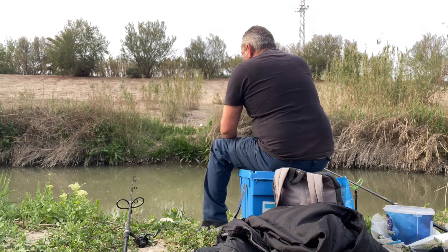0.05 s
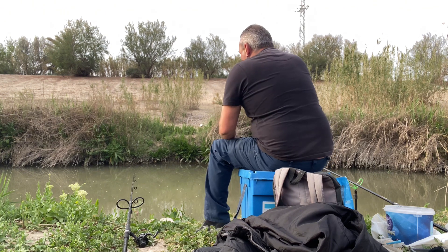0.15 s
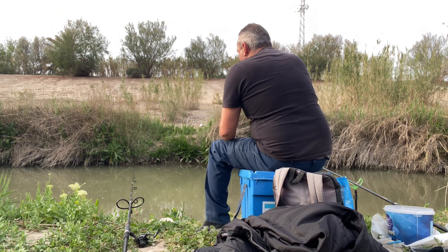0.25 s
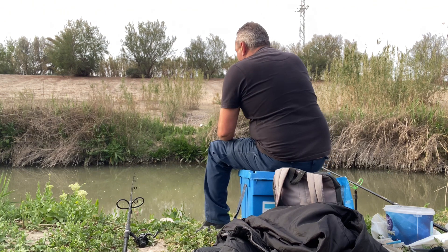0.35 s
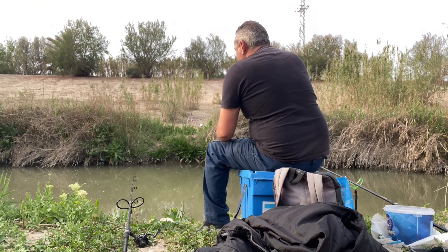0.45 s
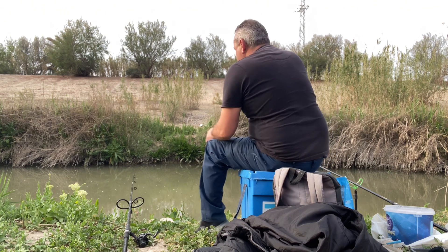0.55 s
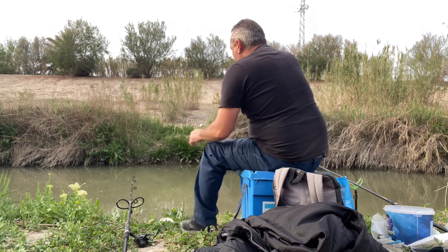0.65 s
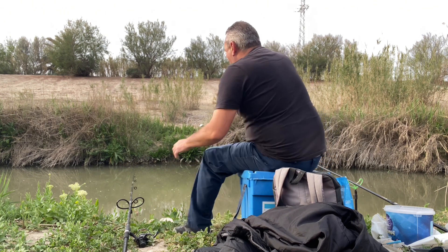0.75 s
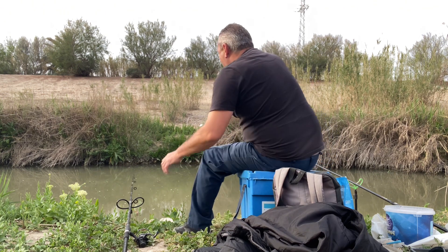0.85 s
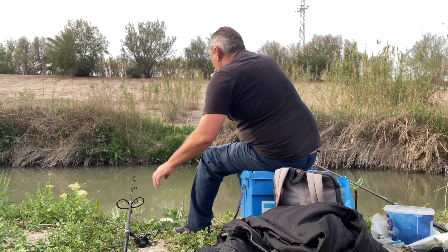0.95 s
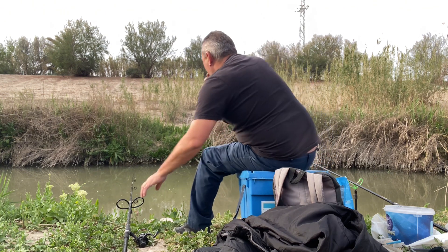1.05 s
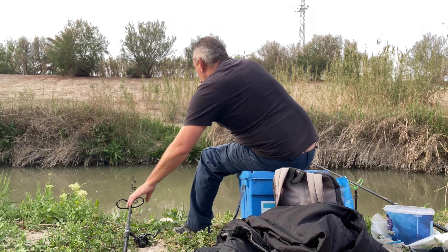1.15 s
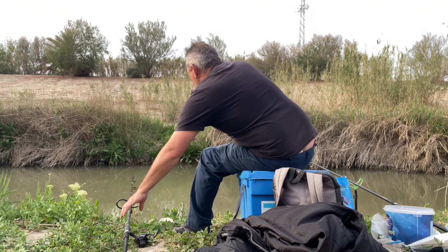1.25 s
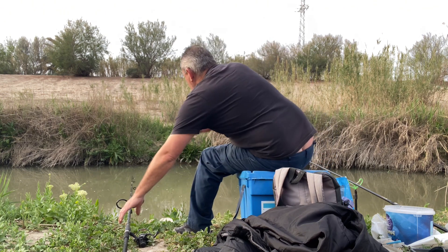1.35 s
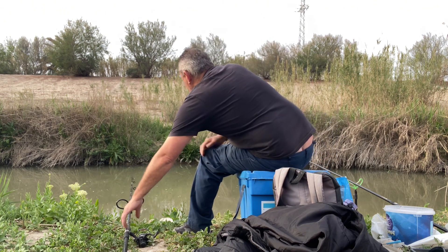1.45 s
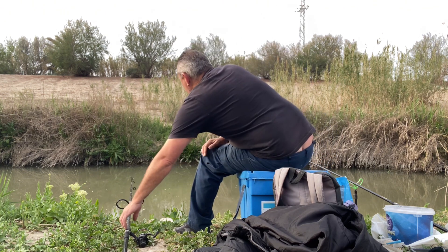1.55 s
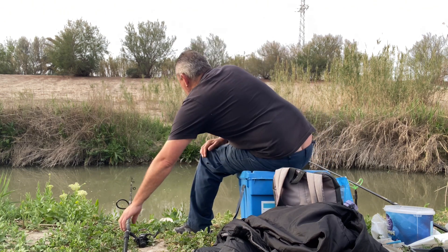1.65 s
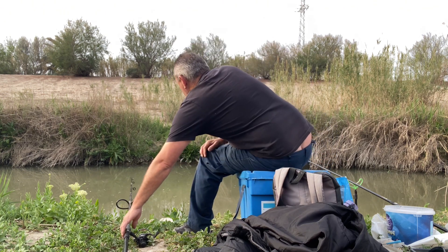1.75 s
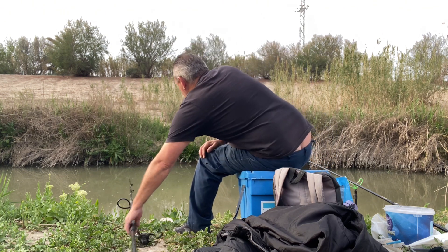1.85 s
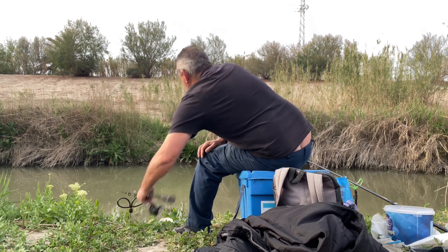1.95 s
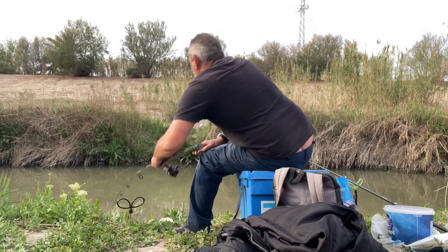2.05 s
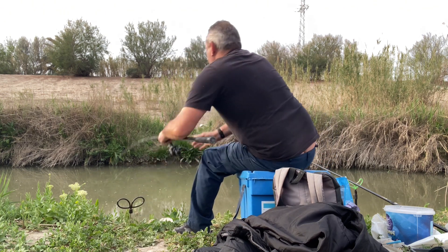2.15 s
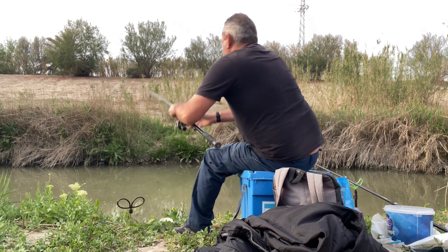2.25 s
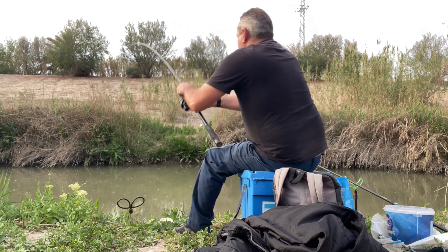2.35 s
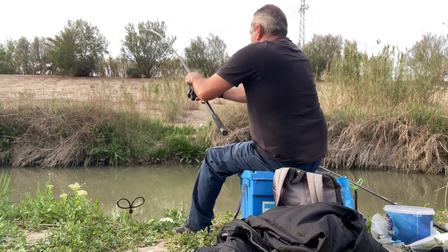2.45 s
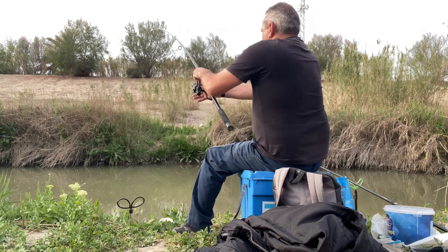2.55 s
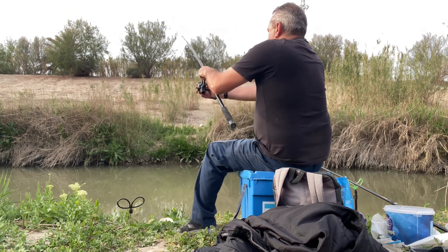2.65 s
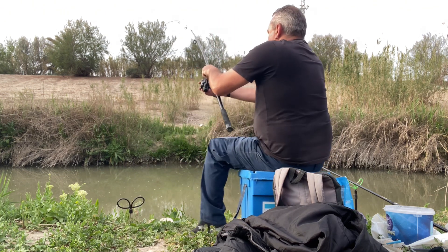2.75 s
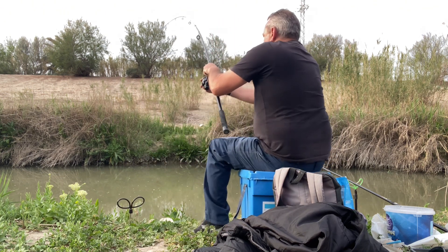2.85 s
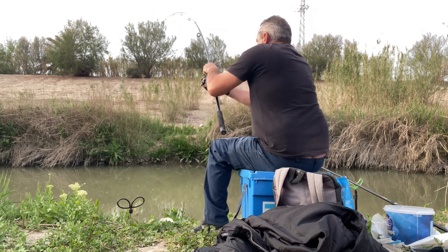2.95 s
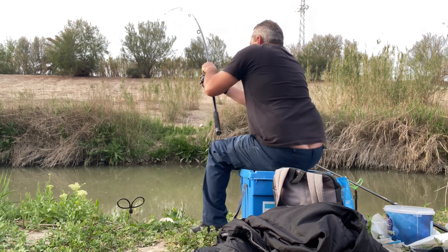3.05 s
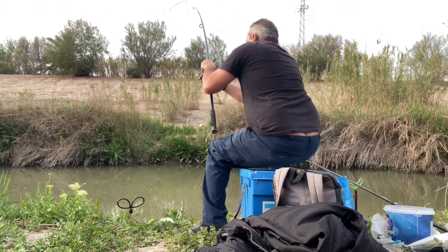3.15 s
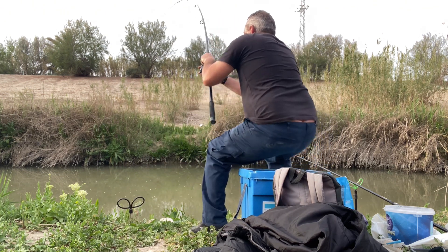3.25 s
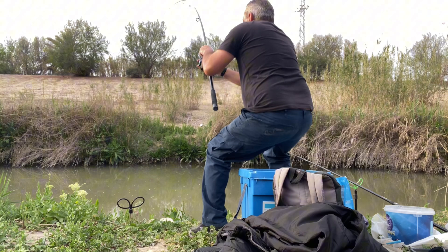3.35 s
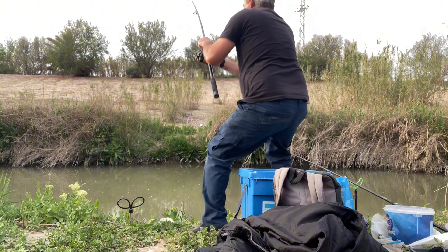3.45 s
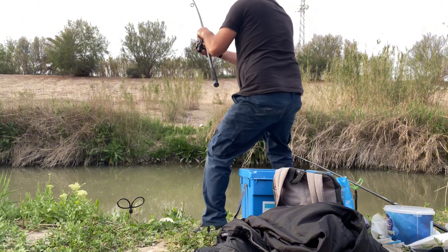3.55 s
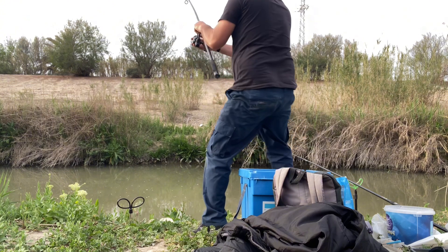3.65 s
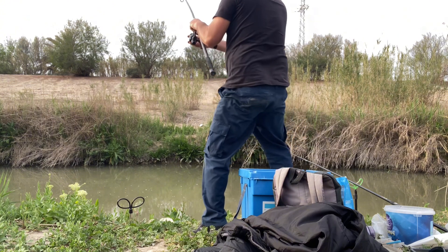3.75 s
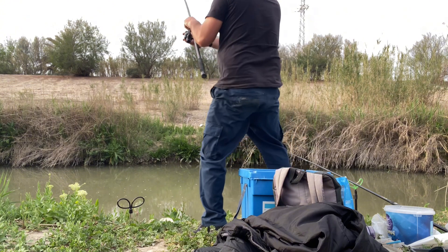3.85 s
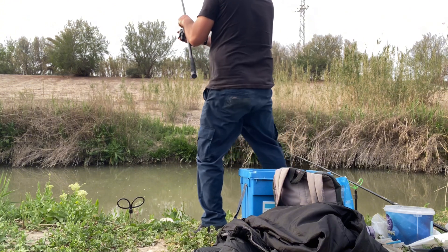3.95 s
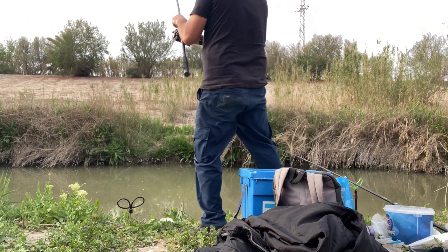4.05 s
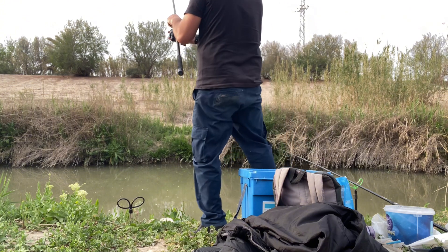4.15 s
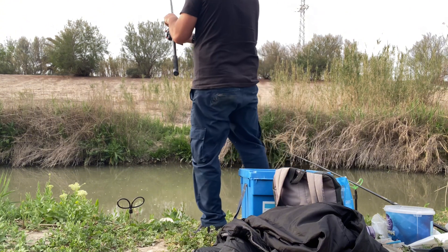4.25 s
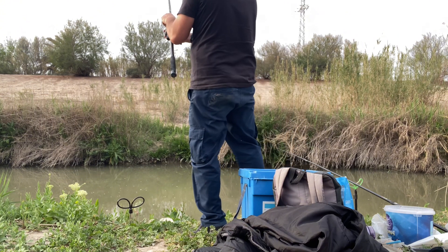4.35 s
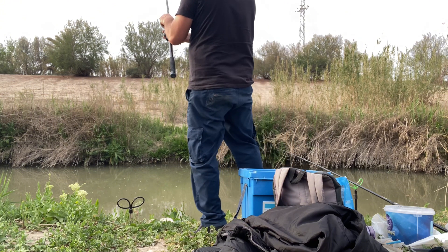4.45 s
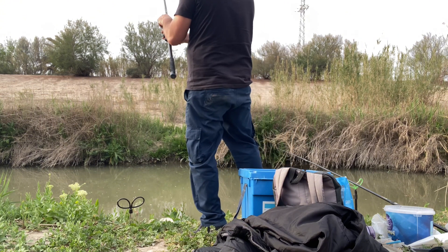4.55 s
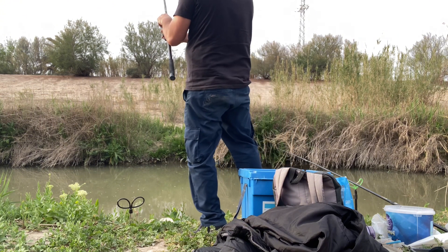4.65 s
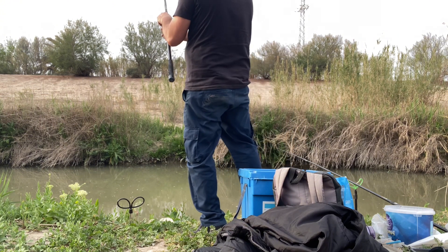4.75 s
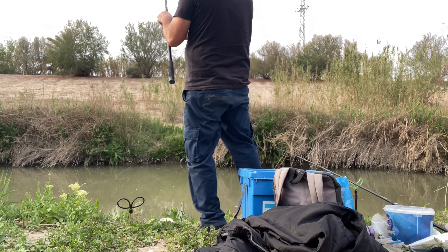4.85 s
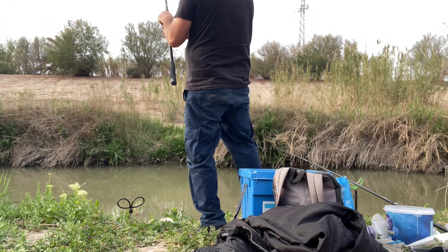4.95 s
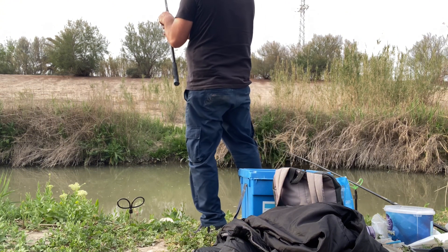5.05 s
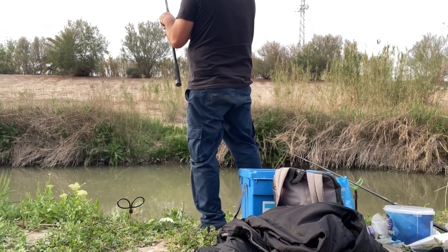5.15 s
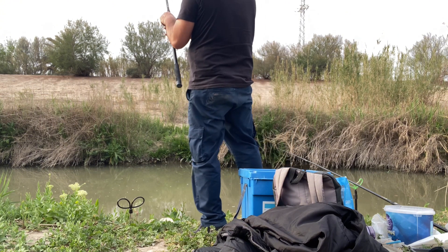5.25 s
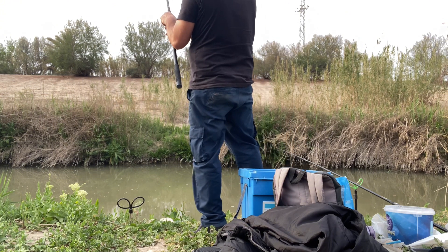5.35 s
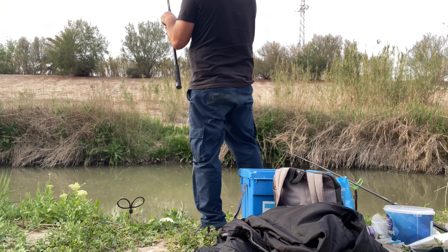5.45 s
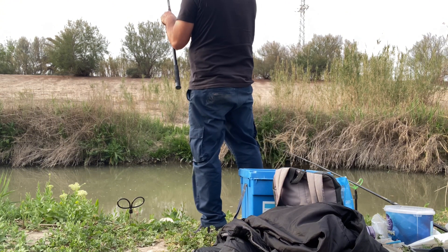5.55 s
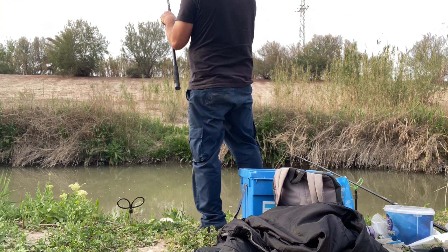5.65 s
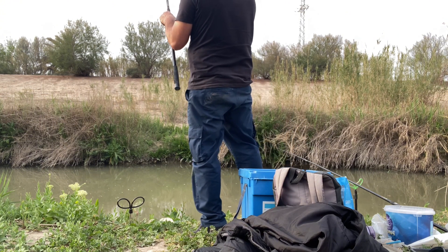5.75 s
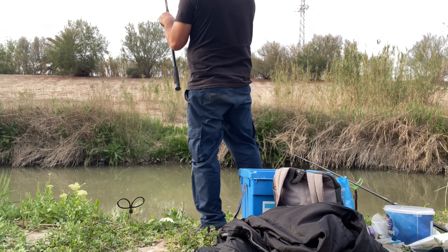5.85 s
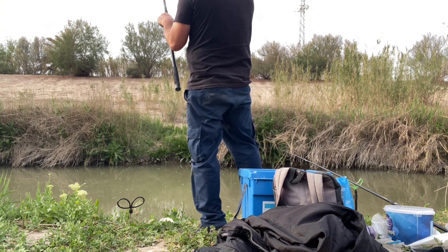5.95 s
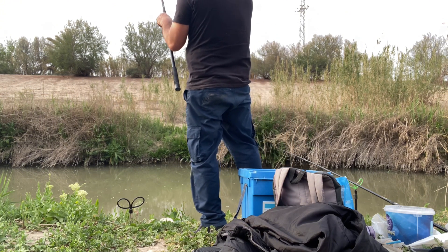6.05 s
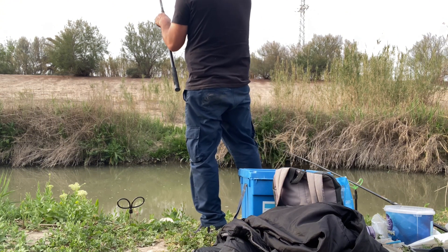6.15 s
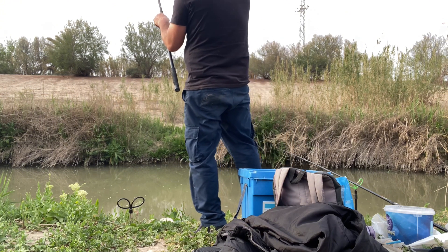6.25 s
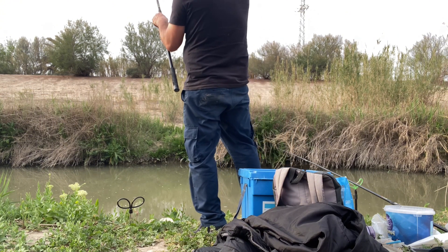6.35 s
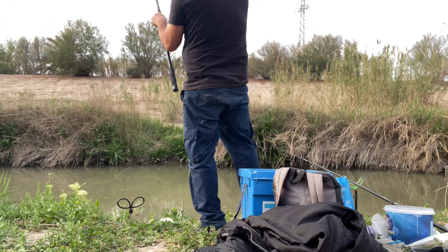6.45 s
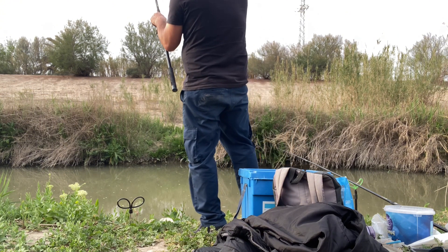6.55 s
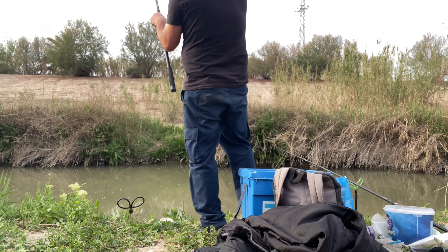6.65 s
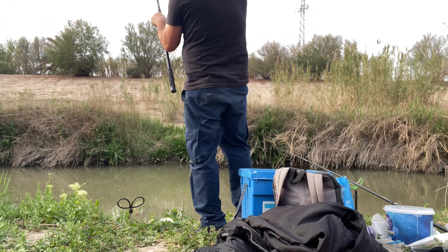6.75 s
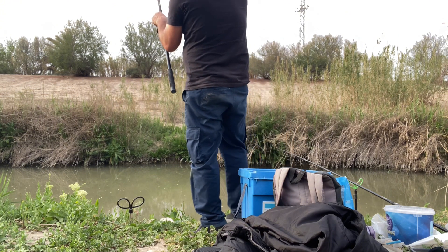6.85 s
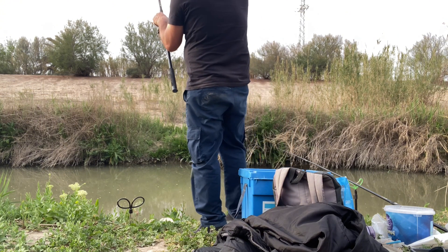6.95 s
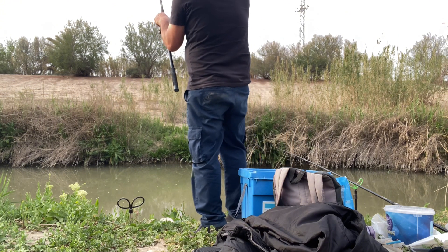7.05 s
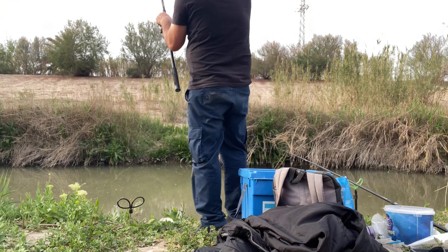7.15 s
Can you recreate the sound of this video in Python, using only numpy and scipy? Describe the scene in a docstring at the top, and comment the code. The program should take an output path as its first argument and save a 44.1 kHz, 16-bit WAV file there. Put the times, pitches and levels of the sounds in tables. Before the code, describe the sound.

Dull thumps and clothing rustle as an angler lifts a rod; the reel ratchets quickly, then ticks unevenly over soft wind and faint birds.

```python
"""Clicking reel on a river bank

The drag ratchet of an angler's reel clicks, once racing into a rasp: tuned modes plus scattered noise.
Knocks thump through the ground into the microphone stand; clothes and grass rustle as grainy noise.
Insects chirp in noise bursts, small birds in gliding sines. Low noise of wind and moving ground rumbles
on two microphone ports over a distant hush of flickering bands and thin drones."""
import sys
import numpy as np
from scipy import signal
from scipy.fft import rfft, irfft, next_fast_len
from scipy.io import wavfile
from scipy.ndimage import uniform_filter1d

SR = 44100
rng = np.random.default_rng(int(sys.argv[2]) if len(sys.argv) > 2 else 0)


def to_wav(s):
    """Save 16-bit WAV."""
    ch = np.atleast_2d(s).T  # columns
    pcm = np.round(np.clip(ch, -1, 1) * 32767)  # PCM
    wavfile.write(sys.argv[1], SR, pcm.astype(np.int16))


N = 317916
T = np.arange(N) / SR

# line pulled off the spool by the fish, one curve per pull: t/s, speed/(teeth per s)
PULLS = [
    [(2.1692, 44.0), (2.215, 132.4), (2.25, 274.2), (2.31, 468.2), (2.345, 522.9), (2.385, 485.2),
     (2.43, 353.4), (2.485, 319.1), (2.53, 202.6), (2.565, 116.9), (2.584, 50.7)],
    [(3.5795, 27.4), (3.63, 36.3), (3.685, 63.2), (3.747, 26.4)],
    [(3.8495, 37.7), (3.885, 45.8), (3.915, 98.2), (3.94, 118.8), (3.97, 89.1), (4.051, 25.8)],
    [(4.3557, 35.8), (4.4, 60.8), (4.42, 95.8), (4.447, 106.7), (4.48, 81.2), (4.551, 50.4)],
    [(5.179, 44.1), (5.205, 89.0), (5.23, 100.5), (5.28, 111.4), (5.312, 70.1)],
]
# teeth slipping one at a time: t/s, strength/dB
TICKS = [(2.6836, -2), (2.7163, -12.5), (2.7491, 0), (3.4328, -1), (4.6551, 0), (4.7738, -0.5),
         (4.9532, -1.5), (5.0076, 2), (5.1437, -2), (5.457, 0), (5.5233, 0.5), (5.5572, 1), (5.5872, 0),
         (5.6163, 0), (5.7119, -1), (6.0055, 2.5)]
# ringing modes of a click: f/Hz, t60/s, level/dB
REEL_MODES = [(3500, 0.0034, -17), (3610, 0.016, -3), (4164, 0.015, 0), (5625, 0.011, 1.5),
              (6010, 0.015, -4), (6630, 0.0089, -0.5), (7570, 0.0096, -5.5), (8530, 0.011, -3),
              (9280, 0.012, -4.5), (10180, 0.015, -8.5), (11070, 0.0099, -7.5), (12700, 0.0075, -7.5),
              (13300, 0.0059, -23), (14400, 0.012, -24.5)]
# group of each mode: 1 bright, 2 middle, 3 upper ring, 4 lower ring, 5 whine
MODE_GROUP = [4, 4, 3, 5, 2, 2, 1, 1, 1, 1, 1, 1, 1, 1]
# click colour as the rod swings: t/s, bright/dB, middle/dB, upper ring/dB, lower ring/dB, whine/dB,
# lower ring tuning/ratio, whine tuning/ratio
ROD = [(2.17, -17.5, -20, -24, -50, -20, 1.2, 0.97), (2.245, -18, -18.5, -16.5, -30, -24, 1.3, 0.9),
       (2.285, -15.5, -18, -44, -19.5, -27, 1, 0.91), (2.315, -18, -20, -36, -19.5, -17.5, 1.01, 1.07),
       (2.35, -19, -19, -33, -19.5, -16, 0.91, 1.06), (2.39, -19.5, -18, -27, -26, -19, .97, .96),
       (2.43, -18, -20, -28, -28, -26, .95, 0.93), (2.46, -16.5, -20, -24.5, -38, -28, 0.83, .94),
       (2.526, -17.5, -18, -23.5, -46.5, -28, 0.64, .94), (2.581, -18, -17, -22, -40, -19.5, 0.8, 0.93),
       (3.58, -21.5, -22, -25.5, -25, -23, 0.91, 0.93), (3.66, -17, -20.5, -27.5, -34, -19, 1.2, .99),
       (3.74, -16.5, -18.5, -25, -34, -26, 1.1, 0.94), (3.86, -16.5, -19.5, -28.5, -38, -24, 0.88, 0.94),
       (3.95, -17.5, -22, -30, -31, -19.5, 0.9, 1.07), (4.05, -19, -19.5, -31, -34, -20.5, 1.2, 0.93),
       (4.36, -21.5, -23.5, -31.5, -28, -27, .99, 0.97), (4.45, -19.5, -20, -35, -24, -28, .99, 0.93),
       (4.55, -20.5, -25, -41, -24, -28, 0.98, 0.86), (4.72, -24, -29, -40, -27.5, -39, 1.03, 0.92),
       (5.18, -22.5, -22, -37, -27, -29, 0.95, 1.24), (5.22, -20.5, -24, -29, -25.5, -37, 0.99, 1.03),
       (5.27, -18.5, -27, -29, -26.5, -34, 0.98, .99), (5.31, -22, -17.5, -44, -25, -28, 1.04, 1.2),
       (5.46, -25, -24, -40, -26.5, -29, 0.95, 1.15), (5.6, -21.5, -21.5, -24.5, -28.5, -26.5, 1.01, 0.93),
       (6.0, -23, -23.5, -41, -29.5, -31, 0.91, .99)]
# upper ring tuning: t/s, tuning/ratio
UPPER_TUNING = [(2.19, 1.01), (2.24, 0.96), (2.3, .96), (2.38, 1.04), (2.43, 0.99), (2.47, 1.06),
                (2.58, 0.982), (5.2, 1), (5.25, 0.92)]
# click noise scattered by rod, reeds and bank: low f/Hz, high f/Hz, rise/s, t60/s, level/dB
WASH = [(1710, 3160, 0.0037, 0.063, -31), (1010, 1620, 0.0013, 0.073, -24.5),
        (3020, 4450, 0.00051, 0.2, -30.5), (3680, 4620, 0.0011, 0.25, -25), (5030, 7000, 0.00018, 0.2, -26),
        (6400, 10600, 0.000904, 0.22, -25), (11600, 15200, 0.00042, 0.046, -15.5),
        (1258, 1460, .002, 0.081, -25)]
# group that feeds each wash band, numbered as in MODE_GROUP
WASH_GROUP = [2, 1, 4, 3, 2, 1, 1, 5]
# knocks: t/s, crack/dB, thump/dB, snap/dB, thump time to peak/s, thump f/Hz, ring/dB, ring f/Hz
KNOCKS = [(.549, -33, -60, -44, .01, 90, -28, 1310), (.584, -32, -60, -55, .01, 90, -31, 695),
          (0.664, -26, -41, -32, 0.014, 90, -33, 900), (0.682, -50, -60, -45, .01, 90, -42, 3500),
          (0.745, -16.5, -10.5, -34.5, 0.014, 124, -21.5, 1680),
          (0.776, -43, -20, -52, 0.026, 65, -26, 800), (1.088, -37, -23.5, -64, 0.02, 133, -39, 400),
          (1.139, -55, -22.5, -70, 0.019, 76, -55, 900), (1.251, -48, -30, -51.5, 0.018, 70, -32, 2900),
          (1.28, -44, -24.5, -66, 0.022, 69, -31, 715), (1.41, -55, -50, -66, .01, 90, -37, 1300),
          (1.615, -38, -49, -59, 0.01, 90, -38, 2750), (1.846, -38, -50, -60, .01, 90, -38, 1300),
          (1.86, -36, -39, -55, .01, 90, -30, 1600), (1.873, -15, -8, -34.5, 0.016, 101, -22, 2090),
          (2.109, -38, -44, -60, 0.012, 90, -35, 1900), (2.226, -7.5, -6, -29, 0.016, 94, -12.5, 1260),
          (2.478, -23, -48, -23, 0.01, 90, -20, 1410), (2.762, -30, -43, -54, 0.01, 90, -25, 1300),
          (2.832, 0.5, -1.5, -14, 0.0093, 112.5, -10, 600), (2.848, -18, -37, -35, .01, 120, -15, 1900),
          (2.86, -27, -8, -50, 0.006, 75, -22, 1100), (2.914, -2, -12, -22.5, 0.0053, 258, -9, 1700),
          (2.93, -42, -6, -35, 0.0057, 79, -13.5, 422), (2.954, -12, -15, -33, 0.0078, 60, -14, 2040),
          (2.98, -20, -7, -58, 0.014, 113.5, -22, 1700), (3.017, -23, -14, -53, 0.013, 85, -33, 2000),
          (3.044, -22, -46, -53, 0.0084, 90, -28, 2000), (3.099, -30, -46, -77, 0.011, 90, -25, 1100),
          (3.698, -35, -13, -25, 0.016, 70, -26, 603), (4.093, -44, -40, -66, 0.0055, 200, -34, 800),
          (4.105, -34, -23.5, -63, 0.0028, 345, -20, 765), (4.152, -45, -50, -65, .01, 90, -38, 2500),
          (4.242, -29.5, -30, -70, 0.0081, 90, -33, 2200)]
# cloth and grass as the angler moves: peak t/s, rise/s, fall/s, low scuff/dB, scrape/dB, high swish/dB
RUSTLE = [(.5, 0.12, 0.077, -51, -55.5, -60.5), (0.555, 0.037, 0.11, -40.5, -48, -46.5),
          (0.671, 0.04, 0.056, -36.5, -45.5, -45), (1.247, 0.0065, 0.024, -43.5, -46, -74),
          (1.285, 0.035, 0.025, -42, -64, -81), (1.436, 0.051, 0.04, -74, -62, -57.5),
          (1.5, 1, 0.24, -58, -79.5, -67), (1.87, 0.095, 0.11, -58, -48.5, -44.5),
          (2.02, 0.033, 0.047, -61, -44, -45.5), (2.15, 0.26, 0.076, -45, -75, -64),
          (2.6, 0.0045, 0.028, -57, -45, -40), (2.76, 0.17, 0.43, -39, -48.5, -51),
          (2.99, 0.03, 0.035, -40, -48, -57), (3.708, 0.015, 0.0063, -15, -57, -51.5),
          (4.104, 0.068, 0.078, -32.5, -65, -75), (4.19, 0.061, 0.084, -40, -74, -78)]
# narrow hisses and scrapes of the same moves: peak t/s, rise/s, fall/s, level/dB, centre f/Hz, half width/Hz
HISS = [(1.33, 0.12, 0.28, -55.5, 5300, 380), (1.29, .03, .05, -59, 3130, 500),
        (1.4, .07, .1, -64, 3400, 300), (1.864, 0.056, .2, -48, 4730, 700),
        (2.02, 0.063, 0.38, -50, 4770, 800), (3.128, 0.1, 0.36, -49.5, 4110, 754),
        (3.425, 0.044, 0.16, -42.5, 4480, 720), (4.09, 0.042, 0.12, -43, 1450, 300),
        (4.17, 0.055, 0.095, -51, 2590, 790)]
# scratchy insect chirps: t/s, level/dB
INSECT_CHIRPS = [(0.102, -47), (0.211, -48.5), (0.317, -48), (0.426, -51.5), (0.815, -51.5), (0.907, -53),
                 (1.011, -49), (1.1483, -52)]
# whistled bird notes: peak t/s, rise/s, fall/s, level/dB, start f/Hz, peak f/Hz, end f/Hz
NOTES = [(1.811, 0.047, 0.045, -50, 2200, 2810, 2300), (1.815, 0.024, .12, -40, 4200, 4750, 4850),
         (1.93, .06, .08, -54, 4800, 4920, 4840), (2.1, .08, 0.09, -47, 4860, 4780, 4960),
         (6.17, 0.063, 0.11, -63, 4100, 4110, 4000), (6.46, 0.047, 0.11, -63.5, 4300, 4070, 4010)]
# wind, with ground rumble as the angler moves: t/s, low rumble/dB, flutter/dB
LOW_NOISE = [(0.0, -29, -44), (0.5, -27.5, -41), (0.74, -28.5, -39), (1.06, -30.5, -43), (1.28, -25, -33),
             (1.5, -30, -42), (2.09, -27, -42.5), (2.6, -28.5, -41), (2.95, -20.5, -34.5),
             (3.15, -30, -42.5), (3.75, -30.5, -39.5), (4.0, -29, -42.5), (4.18, -26.5, -35),
             (4.35, -29, -38), (4.75, -32, -41), (5.36, -27.5, -40), (5.7, -33, -40.5), (6.2, -28.5, -41.5),
             (7.21, -29, -41)]
# hush spectrum, relative density: f/Hz, level/dB per Hz
HUSH = [(180, -36), (300, -22), (385, -10.5), (511, -24.5), (915, -7), (1660, -33.5), (1930, -27.5),
        (3890, -31.5), (11300, -33.5), (12900, -63), (16000, -61)]
# far, thin drones: from t/s, to t/s, f/Hz, level/dB
DRONES = [(4.7, 7.21, 385, -55), (1.2, 1.66, 515, -57), (3.22, 3.42, 520, -55)]
# phase lag of the right port behind the left for airborne sound: f/Hz, lag/rad
PORT_LAG = [(300, 0), (1100, 3.0), (1700, 6.2), (4400, 6.7), (5200, 7.7), (7000, 8.2), (7700, 4.7),
            (9400, 6.2), (10700, 7.2), (12600, 9.4), (15500, 12.5), (22050, 19)]

FIRST_TOOTH_DB, TOOTH_SCATTER_DB = -0.5, 1.7  # first tooth of a pull is softer; colour varies per tooth
DRIFT_SHARE, DRIFT_PER_S = .009, 14  # tuning wanders as the grip on the reel shifts
WASH_APART_DB = -3  # part of the wash in antiphase between the ports
RING_CYCLES = 15.4  # cycles until a knock's ring is 60 dB down
THUMP_DROP_HZ, THUMP_DROP_S = 171, 0.0049  # a thump falls to its pitch
THUMP_LEFT_DB, THUMP_LEFT_HZ = -15.5, (172, 376)  # band of a thump that leans left
RUMBLE_DB, RUMBLE_S = -17, 0.032  # ground rumble re thump, time to peak
ANGLER_SIDE_DB, ANGLER_SIDE_HZ = -3, 350  # so close a source differs between the ports above this f
TRILL_S, TRILL_GAP_S, TRILL_DB = 5.751, .023, -57
SWELL_DROP_DB = 15  # drop one rise before and one fall after a peak
HUSH_DB, HUSH_FLICKER_DB = -53, 2.2  # rms before it is spread over the ports; spread of each band's level
LOW_CUT_HZ, TOP_HZ = 45, 15900


def reel():
    """Each tooth flicks the pawl: the reel's modes ring, then the surroundings scatter noise."""
    clicks = reel_clicks()
    return ports(click_rings(clicks), -.8) + click_wash(clicks)


def reel_clicks():
    """One row per tooth passing the pawl: t/s, then the level/dB of each of the five groups."""
    pulled = np.concatenate([teeth(pull) for pull in PULLS])
    is_first = np.isin(pulled, [pull[0][0] for pull in PULLS])
    times, strength_db = np.vstack([TICKS, np.c_[pulled, FIRST_TOOTH_DB * is_first]]).T
    s, *colour_db, _, _ = np.transpose(ROD)
    levels_db = [strength_db + np.interp(times, s, db) for db in colour_db]
    clicks = np.transpose([times] + levels_db)
    clicks[:, 1:] += TOOTH_SCATTER_DB * rng.standard_normal((len(times), len(colour_db)))
    return clicks


def teeth(pull):
    """Moments at which the turning spool passes a tooth: the integrated speed reaches whole numbers."""
    s, speed = np.transpose(pull)
    t = np.arange(s[0], s[-1], 1 / SR)
    passed = np.cumsum(np.interp(t, s, speed)) / SR
    return np.interp(np.arange(passed[-1]), passed, t)


def click_rings(clicks):
    """Decaying modes, tuned and weighted a little differently for every flick of the pawl."""
    out = np.zeros(N)
    hz, t60, db = np.transpose(REEL_MODES)
    drift = np.array([walk(DRIFT_PER_S) for _ in range(6)])[MODE_GROUP]
    s, *_, lower, whine = np.transpose(ROD)
    for click in clicks:
        now = click[0]
        upper_now = np.interp(now, *np.transpose(UPPER_TUNING))
        group_tuning = np.array([1, 1, 1, upper_now, np.interp(now, s, lower), np.interp(now, s, whine)])
        detune, weight, late = rng.standard_normal((3, len(hz)))
        start = now * SR % 1 / SR + .0005 + .000034 * late  # fraction of a sample, then scatter per mode
        wander = 1 + .008 * detune + DRIFT_SHARE * drift[:, int(now * SR)]
        mode_hz = hz * group_tuning[MODE_GROUP] * wander
        mode_db = db + click[MODE_GROUP] + 1.2 * weight
        add(out, now, ring(mode_hz, t60, mode_db, start))
    # so small a body radiates little below its lowest mode
    return signal.sosfilt(signal.ellip(5, 1, 34, 3200, "high", fs=SR, output="sos"), out)


def click_wash(clicks):
    """Scattered noise bands; the powers of successive clicks add up and decay."""
    power = np.zeros((6, N))
    for click in clicks:
        power[1:, int(click[0] * SR)] = undb(2 * click[1:])
    common, apart, t = np.zeros(N), np.zeros(N), T[:SR // 4]
    for (lo_hz, hi_hz, rise, t60, db), group in zip(WASH, WASH_GROUP):
        power_fade = (np.exp(-np.log(1000) * t / t60) * (1 - np.exp(-t / rise))) ** 2
        envelope = undb(db) * np.sqrt(abs(signal.fftconvolve(power[group], power_fade)[:N]))
        common += envelope * band(lo_hz, hi_hz, order=3)
        apart += envelope * band(lo_hz, hi_hz, order=3)
    return ports(common, -.8) + undb(WASH_APART_DB) * apart * np.array([[1], [-1]])


def knocks():
    """A snap, a crack and a short ring come by air; the thump follows through the ground, highs first."""
    air, ground, t = np.zeros(N), np.zeros(N), T[:SR // 5]
    mid, tail, high, low = band(560, 1470), band(217, 1700), band(3200, 12600), band(138, 316)
    rumble = band(72, 201)
    for s, crack_db, thump_db, snap_db, peak_s, thump_hz, ring_db, ring_hz in KNOCKS:
        cut = slice(int(s * SR), int(s * SR) + len(t))
        add(air, s, undb(crack_db) * mid[cut] * t / 0.0078 * np.exp(1 - t / .002 * 1.01))
        add(air, s, undb(crack_db - 21) * tail[cut] * np.exp(-t / 0.013))
        add(air, s, undb(snap_db) * high[cut] * np.exp(-t / 0.0049))
        add(air, s, ring(ring_hz, RING_CYCLES / ring_hz, ring_db, 0.001083))

        hz = thump_hz + THUMP_DROP_HZ * np.exp(-t / THUMP_DROP_S)
        thump = sweep(hz) + 0.14 * low[cut]
        envelope = t / peak_s * np.exp((1 - (t / peak_s) ** 2) / 2)
        add(ground, s + 0.00497, undb(thump_db) * envelope * thump)
        add(ground, s, undb(thump_db + RUMBLE_DB) * rumble[cut] * t / RUMBLE_S * np.exp(1 - t / RUMBLE_S))
        add(ground, s + 0.00299, undb(thump_db - 10) * low[cut] * t / 0.0036 * np.exp(1 - t / 0.0048))
    return air, ground


def rustle():
    """Fibres and stalks slip in dense small grains: noise bands with fast random levels."""
    low, scrape, high = sum(undb(db)[:, None] * swell(peak, rise, fall, bend=1.0)
                            for peak, rise, fall, *db in RUSTLE)
    low = low * unit(grains(2.7) * band(320, 1004))
    scrape = scrape * unit(grains(3.5) * band(1000, 3960, order=3))
    high = high * unit(grains(0.98) * band(2800, 11400))
    hiss = np.zeros(N)
    for peak, rise, fall, db, hz, half_hz in HISS:
        carried = unit(band(30, half_hz) * np.cos(2 * np.pi * hz * T))  # low noise moved up to the centre
        hiss += undb(db) * swell(peak, rise, fall, bend=1.4) * carried
    return low + scrape + high + hiss * unit(grains(2.0))


def grains(spread_db):
    """Fast random gain of slipping fibres."""
    return undb(spread_db * walk(220))


def birds():
    """Bird whistles are wavering sine glides, the faint trill six falling chirps."""
    out, t = np.zeros(N), T[:SR // 20]
    for k, (late, loud, sag) in enumerate(rng.standard_normal((6, 3))):
        chirp = sweep(4100 - (25000 + 8000 * sag) * t) * t / 0.004 * np.exp(1 - t / 0.004)
        add(out, TRILL_S + (k + .12 * late) * TRILL_GAP_S, undb(TRILL_DB + 2.5 * loud) * chirp)
    for peak, rise, fall, db, *glide_hz in NOTES:
        hz = np.interp(T, [peak - rise, peak, peak + fall], glide_hz) * (1 + .01 * walk(200))
        waver = 0.85 + 0.65 * band(23, 200)
        out += np.sqrt(2) * undb(db) * swell(peak, rise, fall, bend=1.7) * waver * sweep(hz)
    return out


def insects():
    """Scratchy insect chirps are short bursts of band-passed noise."""
    out, t, scratch = np.zeros(N), T[:SR // 20], band(4840, 6300)
    for s, db in INSECT_CHIRPS:
        add(out, s, undb(db) * scratch[int(s * SR):][:len(t)] * t / 0.0071 * np.exp(1 - t / 0.0067))
    return out


def wind_and_ground_rumble():
    """Noise of wind and moving ground: low rumble nearly alike on both ports, flutter less so."""
    out = 0
    for column, lo_hz, hi_hz, apart_db in [(1, 22.7, 87.4, -16), (2, 33.6, 232, -1.5)]:
        level = gain_curve([LOW_NOISE], column) * undb(2.0 * walk(7))
        common = band(lo_hz, hi_hz, order=3)
        apart = undb(apart_db) * band(lo_hz, hi_hz, order=3) * np.array([[1], [-1]])
        out = out + level * (common + apart)
    return out


def hush():
    """Far water and leaves in bands a third of an octave apart that flicker alone, with thin drones."""
    hz, db = np.transpose(HUSH)
    out = np.zeros(N)
    for f in 300 * 2 ** np.arange(0, 5.7, 1 / 3):
        level_db = np.interp(np.log(f), np.log(hz), db) + HUSH_FLICKER_DB * walk(14)
        out += undb(level_db) * np.sqrt(f) * band(f / 0.99, f * 1.36)  # sqrt(f): bandwidth grows with f
    drone = sum(gain_curve([[(start, db), (end, db)]], 1) * band(f - 10, f + 10, order=1)
                for start, end, f, db in DRONES)
    return undb(HUSH_DB) * unit(out) + drone


def ports(x, left_db):
    """Left and right port, each shifted by half the phase between them."""
    size = next_fast_len(N + SR)
    half = np.interp(np.arange(size // 2 + 1) * SR / size, *np.transpose(PORT_LAG)) / 2
    spectrum = rfft(x, size)
    return np.array([undb(side * left_db / 2) * irfft(spectrum * np.exp(1j * side * half), size)[:N]
                     for side in (1, -1)])


def undb(db):
    """Amplitude gain of a level in dB."""
    return 10 ** (np.asarray(db) / 20)


def unit(x):
    """Scaled to rms 1."""
    return x / np.sqrt(np.mean(x ** 2))


def through(x, lo_hz, hi_hz, order=2):
    """Butterworth band-pass."""
    return signal.sosfilt(signal.butter(order, [lo_hz, hi_hz], "band", fs=SR, output="sos"), x)


def band(lo_hz, hi_hz, order=2):
    """Band-passed noise of rms 1."""
    return unit(through(rng.standard_normal(N), lo_hz, hi_hz, order))


def walk(rate):
    """Random levels held 1 / rate s and slewed twice; rms 1."""
    k = int(SR / rate)
    held = np.repeat(rng.standard_normal(N // k + 1), k)
    return unit(uniform_filter1d(uniform_filter1d(held, k), k)[:N])


def sweep(hz):
    """Sine whose phase integrates a frequency curve."""
    return np.sin(2 * np.pi * np.cumsum(hz) / SR)


def ring(hz, t60, db, start):
    """Sum of decaying modes, each with its own start."""
    t = np.maximum(T[:SR // 40, None] - start, 0)
    modes = undb(db) * np.sin(2 * np.pi * hz * t) * np.exp(-np.log(1000) * t / t60)
    return np.sum(modes, axis=1)


def swell(peak, rise, fall, bend):
    """Gain that climbs to 1 and dies away; a larger bend holds the top longer and ends sooner."""
    return undb(-SWELL_DROP_DB * np.maximum((peak - T) / rise, (T - peak) / fall) ** bend)


def gain_curve(tables, column):
    """Gain along the dB column of several spans, silent between them."""
    out = np.zeros(N)
    for rows in tables:
        rows = np.array(rows, float)
        edge = np.clip(np.minimum(T - rows[0, 0], rows[-1, 0] - T) / 0.0025, 0, 1)
        out += edge * undb(np.interp(T, rows[:, 0], rows[:, column]))
    return out


def add(out, s, sound):
    """Mix a sound in at s seconds."""
    i = int(s * SR)
    out[i:i + len(sound)] += sound[:N - i]


def scene():
    """All sources on the left and right port."""
    air, ground = knocks()
    far = hush()
    around = np.array([far, np.roll(far, SR)])  # part of the hush arrives from all sides
    side = undb(ANGLER_SIDE_DB) * through(rustle() + knocks()[0], ANGLER_SIDE_HZ, TOP_HZ)  # fresh noise
    angler = rustle() + air + side * np.array([[-1], [1]])
    lean = undb(THUMP_LEFT_DB) * through(ground, *THUMP_LEFT_HZ)
    ground = ground + lean * np.array([[1], [-1]])
    distant = ports(birds() + insects() + 0.98 * far, 0.33) + 0.47 * around
    return reel() + distant + angler + ground + wind_and_ground_rumble()


def record(dry):
    """The microphone drops the deepest bass, peaks clip at full scale, the top is cut."""
    dry = signal.sosfilt(signal.butter(6, LOW_CUT_HZ, "high", fs=SR, output="sos"), dry)
    return signal.sosfilt(signal.ellip(8, .2, 70, TOP_HZ, fs=SR, output="sos"), np.clip(dry, -1, 1))


dry = scene()
out = record(dry)
to_wav(out)
```